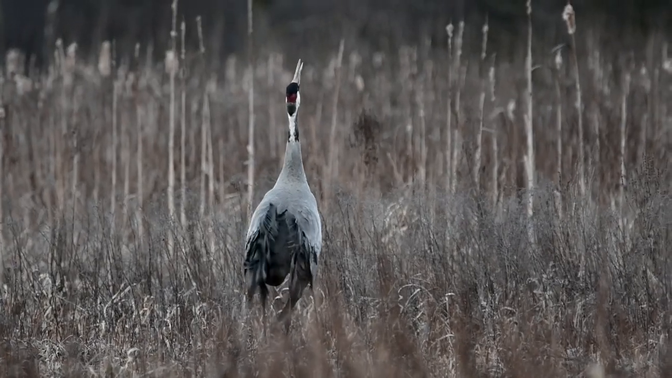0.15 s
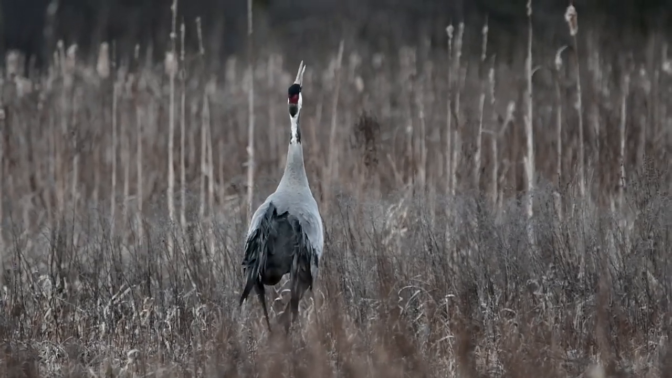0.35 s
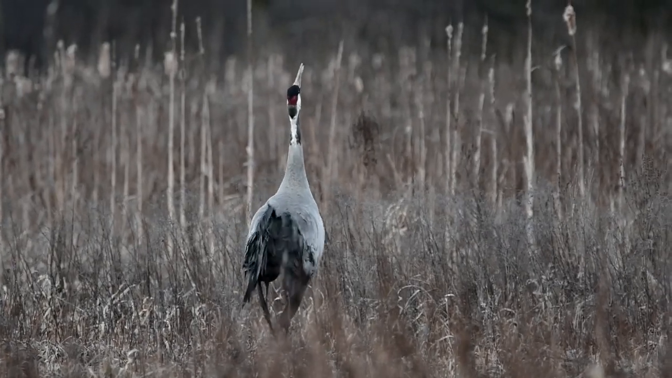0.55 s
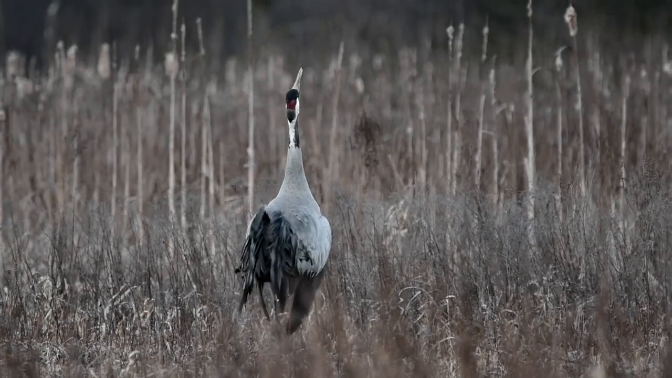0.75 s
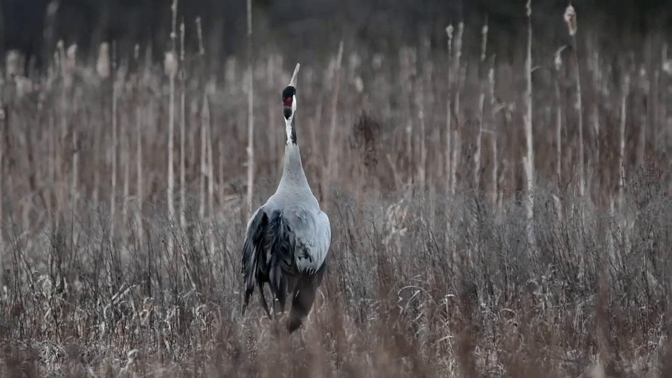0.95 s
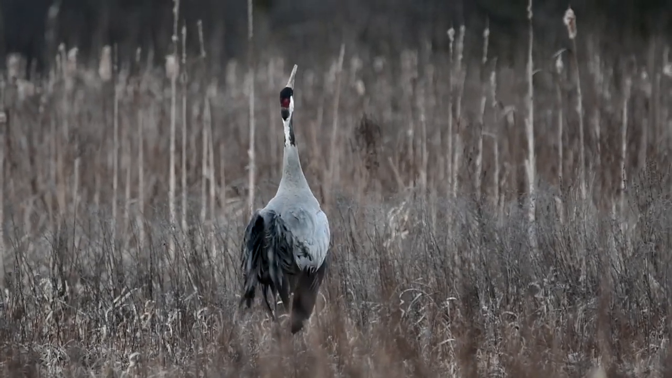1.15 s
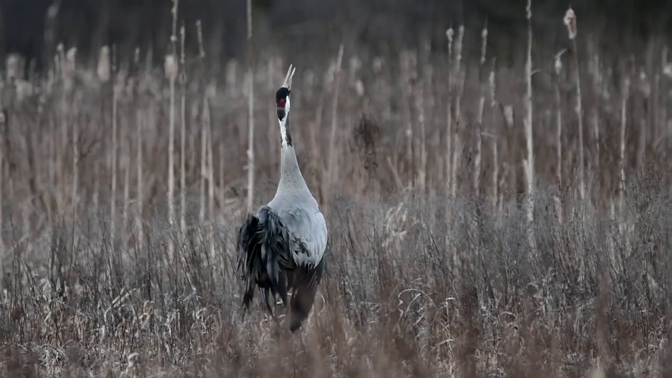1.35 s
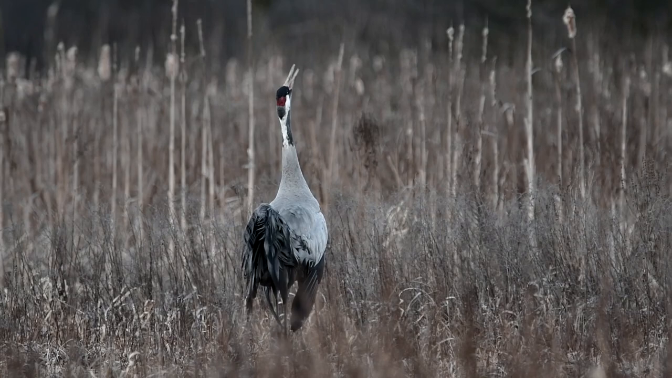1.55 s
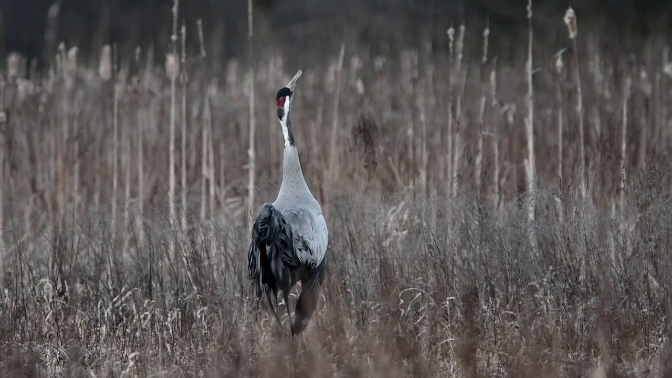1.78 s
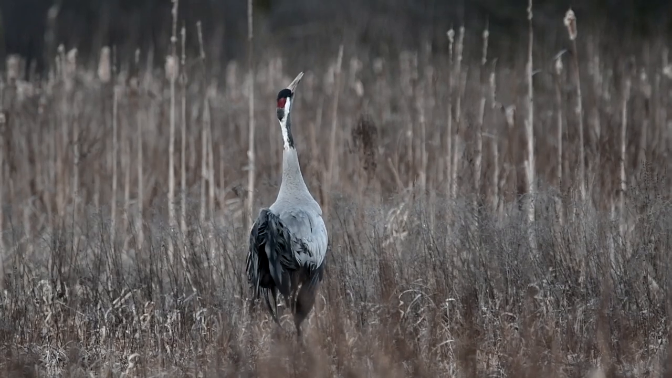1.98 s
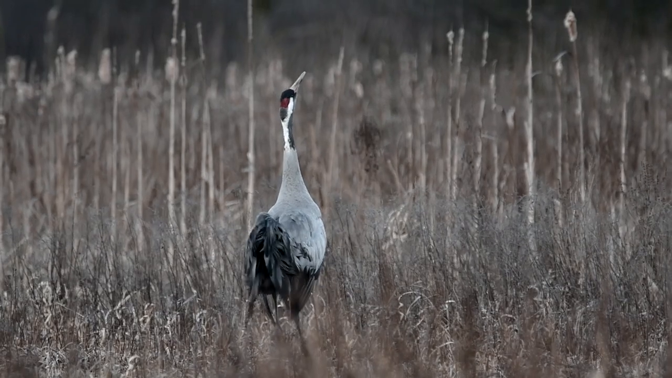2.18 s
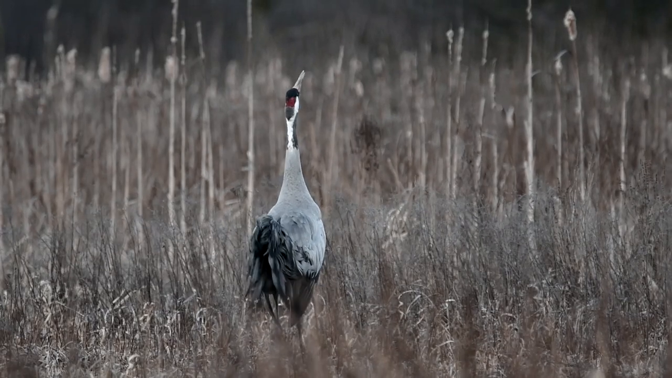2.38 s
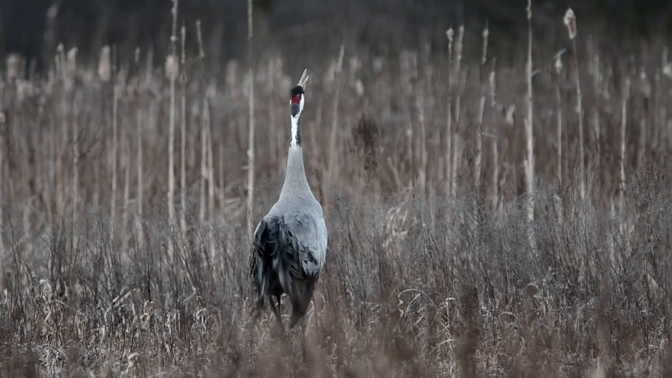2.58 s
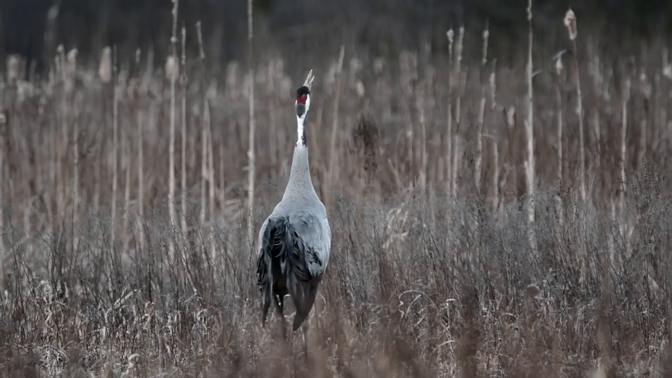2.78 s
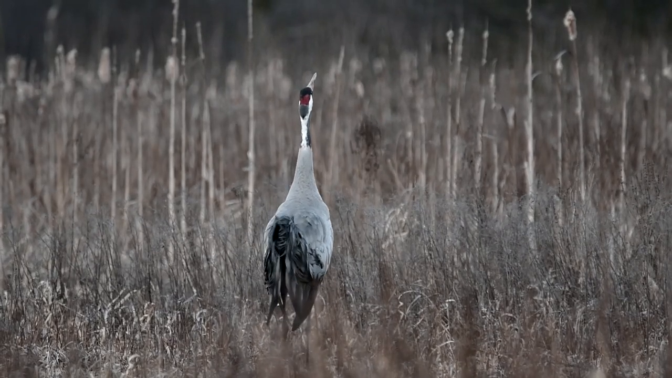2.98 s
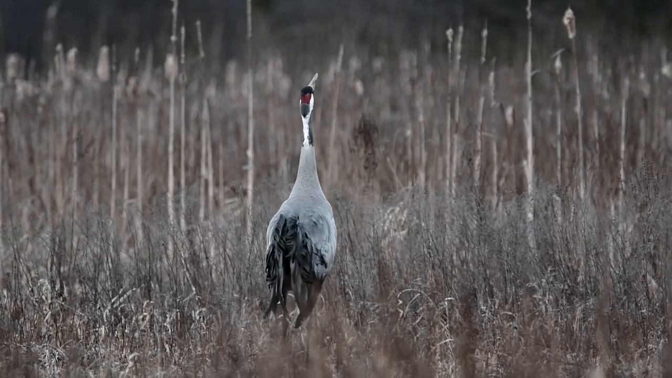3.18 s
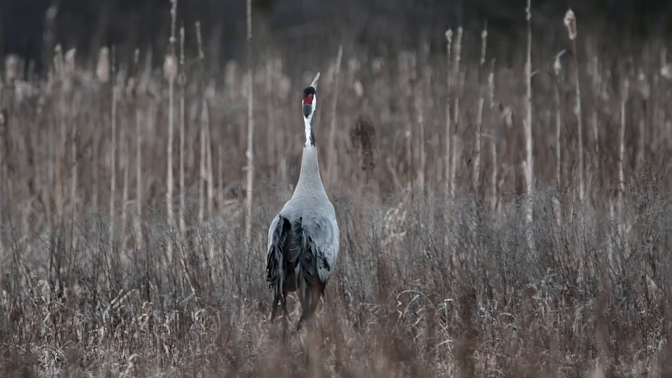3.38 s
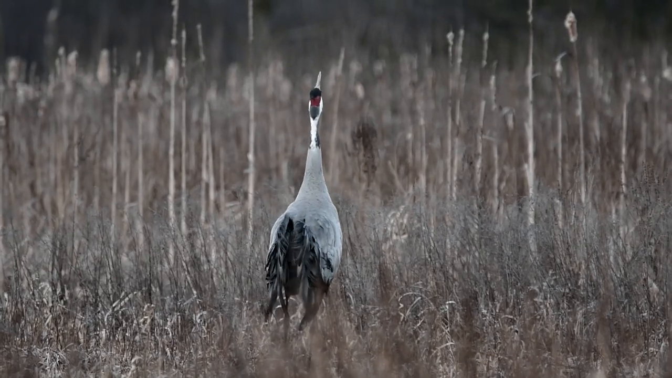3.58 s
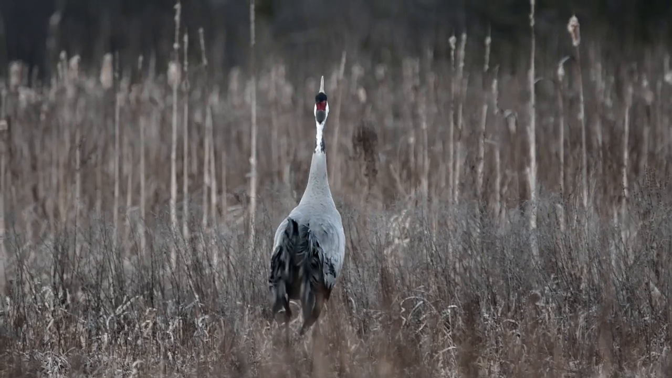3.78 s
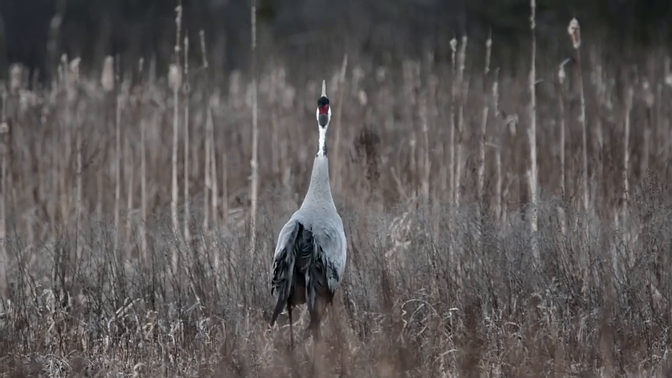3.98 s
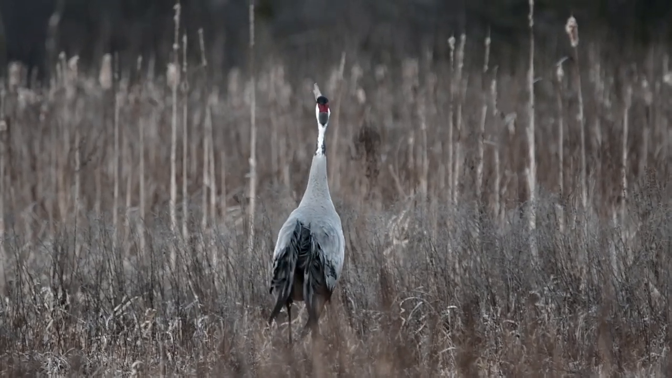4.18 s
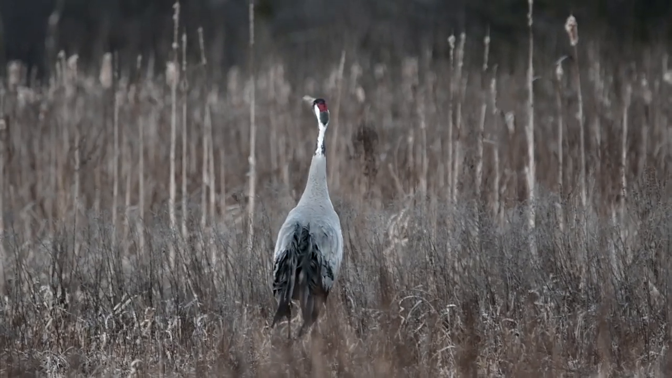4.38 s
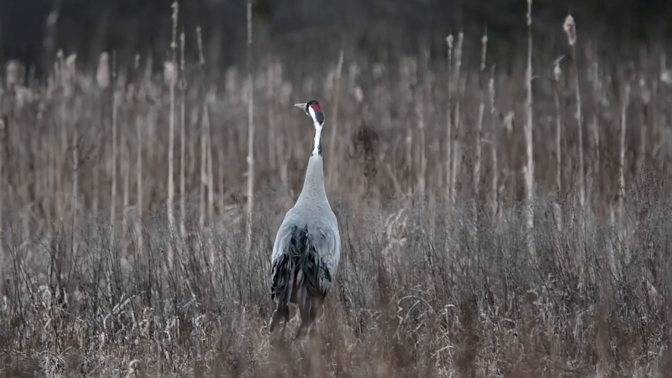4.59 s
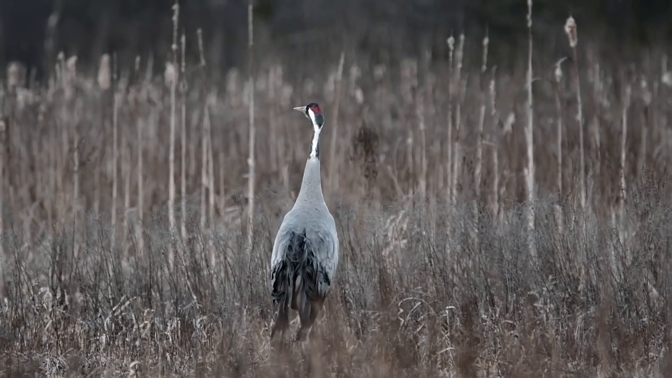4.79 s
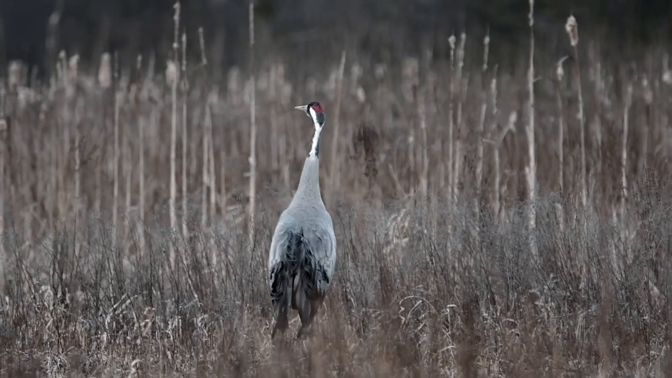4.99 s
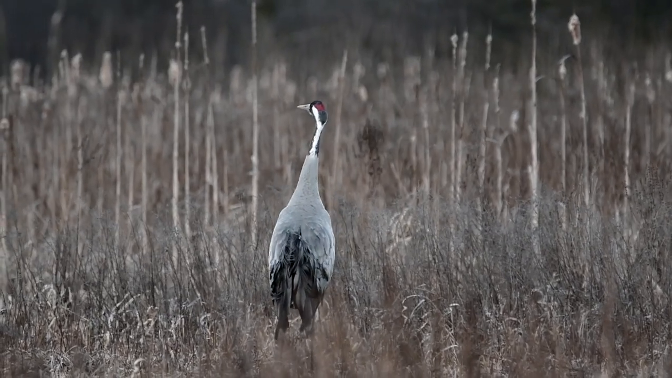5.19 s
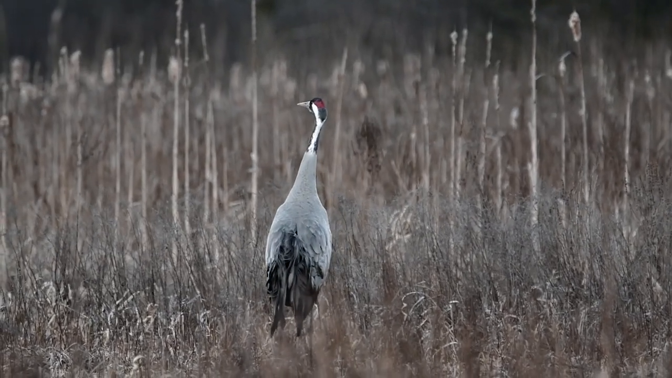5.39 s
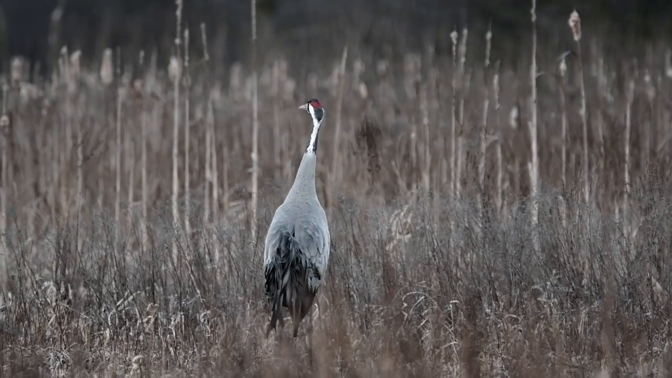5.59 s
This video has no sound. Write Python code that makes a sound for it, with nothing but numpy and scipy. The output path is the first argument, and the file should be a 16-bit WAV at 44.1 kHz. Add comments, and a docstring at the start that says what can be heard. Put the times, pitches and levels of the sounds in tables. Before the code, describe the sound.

A pair of cranes calls outdoors: hoarse bugling blasts breaking into rattles, answered by clean higher toots, with a faint echo from distant trees.

```python
"""Crane duet by the reeds

A pair of cranes calls in duet at the edge of a reed bed, four rounds in all: gliding harmonics through a windpipe.
The male gives a short lead note, then a long brassy blast that leaps up and breaks into a rattle.
The female lays three short, higher toots over it, each stuttering in, locking and dropping loose again.
Decaying noise echoes give the faint tail of reeds and far trees; banded noise makes a soft outdoor hush.
Damped sines make a few low bumps, gliding sines faint small birds, short noise grains dry crackles."""
import sys
import numpy as np
from scipy import signal
from scipy.fft import rfft, irfft, next_fast_len
from scipy.io import wavfile

SR = 44100
rng = np.random.default_rng(int(sys.argv[2]) if len(sys.argv) > 2 else 0)


def master_out(mix):
    """Clip the mix to full scale and print it as 16-bit PCM to the path in sys.argv[1]."""
    frames = np.transpose(np.atleast_2d(mix))
    ceiling = np.clip(frames, -1, 1)
    pcm = np.round(ceiling * 32767).astype(np.int16)
    wavfile.write(sys.argv[1], SR, pcm)


N = 249155
TIME = np.arange(N) / SR

# colour of each bird's long coiled windpipe: (frequency [Hz], level [dB])
MALE_WINDPIPE = [(550, -11), (700, -7), (900, -7.5), (1150, -31.5), (1400, 5), (1650, 3.5), (1850, 1.5),
                 (2350, -9), (2750, -3.5), (3200, -3.5), (4000, -9.5), (5600, -16.5), (6500, -21.5),
                 (9000, -50)]
FEMALE_WINDPIPE = [(600, -9.5), (850, 0), (1000, 0), (1110, -2.5), (1400, 16.5), (1900, 5.5), (2200, 3),
                   (3300, -4.5), (4400, -17), (5500, -26.5), (6600, -16.5), (9000, -88.5)]
# low standing waves of the male's windpipe, rung by ragged blowing: (frequency [Hz], relative level [dB])
LOW_PIPE_MODES = [(735, -1.5), (870, -1)]
# the male's bright lead notes, one a round: (start [s], length [s], top pitch [Hz], level [dB],
# brightness [dB at the fourth harmonic], windpipe ring [dB], hoarse start [s])
LEAD_NOTES = [(-.07, 0.18, 822.4, -41, 5.5, -24.5, 0.013), (1.104, 0.15, 817, -40.5, 5, -2, 0.012),
              (2.319, .166, 797.7, -44, 1.5, 6, .03), (3.597, 0.17, 779, -44.5, 0, 1.5, 0.076)]
# his long blasts: (start [s], hoarse start [s], time to the break [s], rattle length [s], level [dB],
# brightness [dB at the fourth harmonic], ring [dB], rattle roughness [0-1], loss over the rattle [dB],
# release [dB/s], low pipe modes [dB])
LONG_BLASTS = [(.221, 0.0392, 0.27, 0.058, -36, 1, 10, 0.65, 6.5, 231, 1.5),
               (1.343, 0.0831, 0.19, 0.17, -36.5, -1, -0.5, 0.47, 1, 296, 8.5),
               (2.589, 0.119, .133, .16, -35.5, -6, 5, .58, 3.5, 174, 3),
               (3.873, .045, 0.16, 0.22, -36, -1, 6.5, 0.81, 9, 498.5, -1.5)]
# flips into his upper register: (up [s], down [s], pitch [Hz], ring [dB], roughness [0-1])
REGISTER_LEAPS = [(.068, .126, 893, 12, .36), (.2, .503, 908, 14, .02), (1.405, 1.505, 902, -15, .07),
                  (2.635, 2.722, 903, 10, .38), (3.964, 4.03, 897, 2, .24)]
# even runs of air bursts ending each blast:
# (first burst [s], spacing [s], run length [s], level [dB], fade by the last burst [dB])
BURST_RUNS = [(.511, .0175, .095, -38, 13), (1.7, .0315, .08, -40.5, 1), (2.922, .021, .095, -41.5, 4),
              (4.055, .0286, .215, -37.5, 11)]
# the female's toots, three to a round:
# (pitch locks [s], length [s], stutter before it [s], level [dB], brightness above the fundamental [dB])
TOOT_NOTES = [(.135, 0.13, 0.018, -34, -6.5), (0.409, 0.079, 0.022, -33.5, -10.5),
              (0.694, 0.059, 0.029, -37, -4.5), (1.287, .132, .024, -33.5, -10),
              (1.575, .073, 0.033, -33, -6.5), (1.851, 0.066, 0.024, -34.5, -7.5),
              (2.521, 0.13, 0.028, -32, -4), (2.801, 0.086, 0.015, -33, -7.5),
              (3.089, .065, .022, -32.5, -5.5), (3.8, .13, .024, -32.5, -13),
              (4.075, 0.074, 0.034, -36, -7.5), (4.338, .072, .043, -38.5, -4.5)]
# for the first, second and third toot of a round: (pitch [Hz])
TOOT_PITCH_HZ = [1117, 1108, 1103]
# strength of the stutter in the same three toots: (level [dB])
TOOT_STUTTER_DB = [-1, -1, 0.5]
# how the calls lean between the ears: (frequency [Hz], left minus right [dB])
EAR_LEAN = [(60, 8), (100, 2.5), (170, -3.5), (290, -1.5), (480, -4), (820, 2.5), (1380, -2), (2320, -3),
            (3910, 3), (6590, -2.5)]
# spectrum of the outdoor hush: (frequency [Hz], relative band gain [dB])
HUSH_SPECTRUM = [(25, -12.5), (60, -3.5), (130, 2.5), (260, -4.5), (380, -3), (560, -10.5), (900, -4),
                 (1300, -11.5), (3000, -15.5), (6600, -18.5), (7600, -48.5), (9000, -28.5), (11000, -31.5),
                 (15500, -35.5)]
# left-right likeness of the hush: (frequency [Hz], correlation [-1 to 1])
HUSH_LIKENESS = [(60, 0.99), (150, 1), (390, 0.98), (1010, 0.54), (2570, -0.19), (6590, -0.07)]
# low rumble of moving air: (time [s], relative level [dB])
AIR_RUMBLE = [(0, -17.5), (1.7, -2), (2.7, -5), (4.1, 2), (5.6, -10.5)]
# soft low bumps: (start [s], envelope peak [dB], frequency [Hz])
LOW_BUMPS = [(1.068, -50, 170), (1.965, -40.5, 128.5), (2.145, -37.5, 195), (2.186, -35, 182),
             (2.207, -40, 200), (2.374, -42.5, 211), (4.134, -38.5, 183.8), (4.859, -45.5, 137),
             (4.899, -47, 109.4), (5.12, -40.5, 175)]
# faint small birds: (start [s], length [s], start pitch [Hz], end pitch [Hz], level [dB])
BIRD_CHIRPS = [(3.329, 0.031, 6000, 6150, -68), (3.352, 0.052, 6250, 6570, -60),
               (3.443, 0.067, 5940, 6200, -63), (3.49, 0.048, 6250, 6600, -61.5),
               (3.644, 0.06, 6200, 6530, -56.5), (5.506, 0.17, 1700, 1396, -60)]
# crackles of dry stalks: (start [s], length [s], level [dB])
STALK_CRACKLES = [(2.896, 0.0035, -49), (5.15, 0.048, -59)]

RING_HZ, RING_WIDTH_HZ = 2906, 198  # a resonance that comes and goes in the male's note
# a lead note arches in pitch, swells and brightens towards its top, and frays at the end
LEAD_TOP_SHARE, LEAD_SCOOP, LEAD_SWELL_DB, LEAD_OPEN_DB = 0.7, .075, 2.5, 4
LEAD_ROUGH, FRAY_ROUGH, FRAY_S, LEAD_RELEASE_DB_PER_S = .85, .42, .02, 800
LEAD_DROP = .045  # share by which the pitch falls as the note frays
# a blast climbs as it steadies and sinks as it rattles; its level droops as the air runs out
BLAST_HZ, RATTLE_START_HZ = 826, 824
BLAST_SCOOP, RATTLE_SAG = .03, 0.065
STRAIN_ROUGH, STRAIN_S = 0.208, 0.14  # roughness creeps in before the break
ATTACK_S, BREAK_S = 0.0022, 0.01333
HOARSE_ROUGH, HOARSE_DB, DROOP_DB_PER_S = .66, -3.5, 12.5
LEAP_DB, LEAP_BRIGHT_DB, LEAP_ARCH, LEAP_STEADYING = 2.5, -3.5, 0.012, 0.21
BURST_RISE_S, BURST_JITTER_S, BURST_SPREAD_DB = .0056, .0012, 1.0
CATCH_BEFORE_S, CATCH_S, CATCH_DB = 0.022, 0.0013, -9.5  # her voice catches just before the note locks
REEDS_T60_S, REEDS_DB = .22, -16
TREES_T60_S, TREES_CUT_HZ, TREES_DB = 1.6, 3200, -23
HUSH_DB = -57.5
CUTOFF_HZ = 15700


def male(flutter_hz=60, flutter_depth=0.427, flutter_bend=0.086, burst_bend=.11, burst_bright_db=-0.5,
         slack_db=-5, fundamental_trade=.2, top_lift=1.97):
    """Where the note turns rough, each pressure surge moves level, pitch and brightness together."""
    jitter, quaver, rasp_db, mode_width_hz = .039, .003, -9, 28
    gain, pitch, bright_db, ring_db, rough, modes_db = blowing()
    beat = rough * flutter(flutter_hz, wander=.3)
    held = gain * np.exp(flutter_depth * (beat - rough / 2))
    bursts = air_bursts()
    surge = bursts / (bursts + held + from_db(-42.5))

    # between surges the membranes go slack: the pitch sinks and the fundamental takes over
    slack = rough ** 2 * (1 - surge) * (1 - beat)
    bend = flutter_bend * beat + burst_bend * surge - .05 * slack
    unsteady = jitter * rough ** 1.555 * drift(286) + quaver * drift(20)
    pitch = pitch * (1 + bend + unsteady)
    bright_db = bright_db + burst_bright_db * (surge + beat)

    def tilt_db(k):
        """Brightness and slackness shift the balance between the fundamental and harmonic k."""
        share = np.interp(k, [1, 2, 4, 8], [-fundamental_trade, 0, 1, top_lift])
        return bright_db * share + slack_db * slack * (1 if k > 1 else -1)

    tone, phase = trumpet(pitch, MALE_WINDPIPE, tilt_db, ring_db, waver_db=2.5, count=11)
    # in the rough parts each few cycles differ in strength
    level = np.hypot(held, bursts) * np.exp(0.33 * rough * drift(150))
    voice = tone + from_db(rasp_db) * rough * rasp(phase, MALE_WINDPIPE)

    # ragged blowing sets the low pipe modes ringing
    raggedness = from_db(modes_db) * (level * rough ** 2 + bursts / 2)
    ragged = raggedness * rng.standard_normal(N) * np.sqrt(SR / (np.pi * mode_width_hz))
    pipe = sum(from_db(db) * resonate(ragged, hz, mode_width_hz) for hz, db in LOW_PIPE_MODES)
    return level * voice + butter(pipe, 803, "high", order=6)


def blowing():
    """Lead notes and blasts, the stronger one in charge; the upper register is higher, louder and rounder."""
    lead, blast = lead_notes(), blasts()
    gain, pitch, bright_db, ring_db, rough, modes_db = np.where(lead[0] > blast[0], lead, blast)
    age, down, high_hz, high_ring_db, high_rough = sounding(REGISTER_LEAPS)
    length = down - (TIME - age)
    high = ramp(2 * age / BREAK_S) * ramp((down - TIME) / BREAK_S + .5)
    high_hz = high_hz * (1 - LEAP_ARCH * (2 * ramp(age / length) - 1) ** 2)

    gain = gain * from_db(LEAP_DB * high)
    pitch = pitch + high * (high_hz - pitch)
    bright_db = bright_db + LEAP_BRIGHT_DB * high
    ring_db = ring_db + high * (high_ring_db - ring_db)
    rough = ramp(np.maximum(rough * (1 - LEAP_STEADYING * high), high * high_rough))
    return gain, pitch, bright_db, ring_db, rough, modes_db


def lead_notes():
    """Gain, pitch, brightness, ring, roughness and low-mode level of the male's arched opening notes."""
    age, length, top_hz, level_db, bright_db, ring_db, hoarse_s = sounding(LEAD_NOTES)
    off_top = ramp(np.abs(age / length / LEAD_TOP_SHARE - 1) ** 1.7)
    hoarse = np.exp(-(age / hoarse_s) ** 2)
    fray = np.exp(np.minimum(age - length, 0) / FRAY_S)
    release_db = LEAD_RELEASE_DB_PER_S * np.maximum(age - length, 0)
    level_db = level_db + HOARSE_DB * hoarse - LEAD_SWELL_DB * off_top - release_db
    gain = ramp(age / ATTACK_S) * from_db(level_db)
    pitch = top_hz * (1 - LEAD_SCOOP * off_top - LEAD_DROP * fray)
    bright_db = bright_db - LEAD_OPEN_DB * off_top
    rough = LEAD_ROUGH * hoarse + FRAY_ROUGH * fray
    return np.array([gain, pitch, bright_db, ring_db, rough, np.zeros(N)])


def blasts():
    """The same controls for his long notes: a hoarse start, a clearer middle, then a sinking rattle."""
    (age, hoarse_s, break_s, rattle_s, level_db, bright_db, ring_db,
     rattle_rough, loss_db, release_db_per_s, modes_db) = sounding(LONG_BLASTS)
    hoarse = 1 - ramp(age / hoarse_s) ** 3
    broken = ramp((age - break_s) / BREAK_S + .5)
    spent = np.clip((age - break_s) / rattle_s, 0, 2)
    strain = STRAIN_ROUGH * np.exp(np.minimum(age - break_s, 0) / STRAIN_S)
    rough = (1 - broken) * np.maximum(HOARSE_ROUGH * hoarse, strain) + broken * rattle_rough

    steady_hz = BLAST_HZ * (1 - BLAST_SCOOP * hoarse)
    rattle_hz = RATTLE_START_HZ * (1 - RATTLE_SAG * spent)
    pitch = (1 - broken) * steady_hz + broken * rattle_hz

    droop_db = DROOP_DB_PER_S * np.maximum(age - hoarse_s, 0)
    release_db = release_db_per_s * np.maximum(age - break_s - rattle_s, 0)
    level_db = level_db + HOARSE_DB * hoarse - droop_db - loss_db * spent ** 2 - release_db
    gain = ramp(age / ATTACK_S) * from_db(level_db)
    return np.array([gain, pitch, bright_db, ring_db, rough, modes_db])


def air_bursts():
    """Runs of pressure surges that mostly hold their strength and fade at the last."""
    out = 0
    for first, spacing, length, level_db, fade_db in BURST_RUNS:
        ages = np.arange(0, length, spacing)
        for age, (late, strong) in zip(ages, rng.standard_normal((len(ages), 2))):
            db = level_db - fade_db * (age / ages[-1]) ** 6 + BURST_SPREAD_DB * strong
            out = out + from_db(db) * puff(first + age + BURST_JITTER_S * late, BURST_RISE_S)
    return out


def female(scoop=0.091, sag=0.03, rise=.008, fall=0.17, fall_s=0.011, fade_s=0.017,
           stutter_hz=80, stutter_depth=0.42, loose_dull_db=-12, jitter=0.04):
    """Each toot stutters in low, locks onto a clean arched pitch, sags, then drops loose again and dies."""
    rasp_db = -6
    notes = np.array(TOOT_NOTES)
    halfway = (notes[1:, 0] + notes[:-1, 0] + notes[:-1, 1]) / 2  # middle of each gap between notes
    nearest = np.searchsorted(halfway, TIME)
    lock, length, lead_s, level_db, bright_db = notes[nearest].T
    end = lock + length
    pitch = np.array(TOOT_PITCH_HZ)[nearest % len(TOOT_PITCH_HZ)]

    before = ramp((lock - TIME) / .009)
    after = ramp((TIME - end) / fall_s + .5)
    loose = np.maximum(before, after)
    along = ramp((TIME - lock) / length)
    unsettled = np.maximum(loose, 0.55 * np.exp(-np.maximum(TIME - lock, 0) / 0.013))
    beat = unsettled * flutter(stutter_hz, wander=0.27)

    arch = rise * (1 - along) ** 4 + sag * along ** 3
    unsteady = 0.037 * beat + jitter * loose * drift(260) + 0.00087 * drift(40)
    pitch = pitch * (1 - scoop * before - fall * after - arch + unsteady)
    attack = ramp((TIME - lock + lead_s) / 0.0028)
    gate = attack * np.exp(-np.maximum(TIME - end, 0) / fade_s)

    # the upper harmonics are the last to come and the first to go
    weak = np.maximum(loose, (2 * along - 1) ** 4 / 2)

    def tilt_db(k):
        """Note brightness, less the dulling of harmonic k where the voice is weak."""
        return bright_db * (k > 1) + loose_dull_db * weak * np.log(k)

    tone, phase = trumpet(pitch, FEMALE_WINDPIPE, tilt_db, 0, waver_db=0.0, count=7)
    breath = butter(rasp(phase, FEMALE_WINDPIPE), 3800, "low", order=1)
    breaking = from_db(rasp_db) * (np.maximum(loose, unsettled ** 2) + 0.032) * breath

    catch = np.exp(-((TIME - lock + CATCH_BEFORE_S) / CATCH_S) ** 2)
    stutter_db = before * np.array(TOOT_STUTTER_DB)[nearest % len(TOOT_STUTTER_DB)]
    gain = from_db(level_db + stutter_db + CATCH_DB * catch) * gate
    return gain * (1 + stutter_depth * (beat - unsettled / 3)) * (tone + breaking)


def trumpet(pitch, pipe, tilt_db, ring_db, waver_db, count):
    """Harmonics of the syrinx, each weighted by the windpipe as it glides."""
    phase, out = 2 * np.pi * np.cumsum(pitch) / SR, 0
    spread = .16
    for k in range(1, count + 1):
        hz = k * pitch
        ring = ring_db * np.exp(-.5 * ((hz - RING_HZ) / RING_WIDTH_HZ) ** 2)
        gain = from_db(at_hz(pipe, hz) + tilt_db(k) + ring + waver_db * drift(13.4))
        # the long pipe smears each pulse a little: upper harmonics arrive later
        out = out + gain * np.cos(k * phase - spread * k * k)
    return np.sqrt(2) * out, phase


def rasp(phase, pipe):
    """Turbulence let through once a cycle and coloured by the windpipe."""
    hz = np.linspace(0, SR / 2, 513)
    colour = signal.firwin2(511, hz, from_db(at_hz(pipe, hz)), fs=SR)
    puffs = rng.standard_normal(N) * (1 + np.cos(phase)) ** 2
    coloured = signal.fftconvolve(puffs, colour, "same")
    return rms_one(butter(coloured, 620, "high", order=6))


def flutter(hz, wander):
    """An uneven beat of the syrinx membranes."""
    return np.sin(2 * np.pi * np.cumsum(hz * (1 + wander * drift(20))) / SR)


def place(x, pan_db, lag_ms):
    """A direction: the ears differ in level, pitch by pitch, and the right hears it a little later."""
    size = next_fast_len(N + 1000)
    hz = np.fft.rfftfreq(size, 1 / SR)
    lean_db = pan_db + at_hz(EAR_LEAN, hz)
    late = np.exp(-2j * np.pi * hz * lag_ms / 1000)
    ears = np.array([from_db(lean_db / 2), late * from_db(-lean_db / 2)])
    return irfft(rfft(x, size) * ears, size)[:, :N]


def scatter(x, t60, delay_s, cut_hz, alike):
    """Countless small reflections that build up and die away, partly shared by the two ears."""
    t = np.arange(int(1.5 * SR)) / SR
    envelope = from_db(-60 * t / t60) * (1 - np.exp(-t / delay_s))
    mid, side = rng.standard_normal((2, len(t))) * envelope
    echoes = two_ears(mid, side, alike)
    echoes = butter(echoes / np.sqrt(np.sum(echoes ** 2) / 2), cut_hz, "low")
    return signal.fftconvolve(x[None], echoes, axes=1)[:, :N]


def hush(patchy_db=0.5):
    """Air over the reeds and far country: noise bands that waver slightly; the lowest follow the breeze."""
    out, edges = 0, np.geomspace(22, 16000, 28)  # roughly third-octave bands
    white = rng.standard_normal((2, 2, N))
    rumble_db = np.interp(TIME, *np.transpose(AIR_RUMBLE))
    for k, (low, high) in enumerate(zip(edges, edges[1:])):
        # neighbouring bands take turns on two separate noises
        mid, side = butter(white[k % 2], [low, high], "band", order=3)
        hz = np.sqrt(low * high)
        waver_db = patchy_db * drift(19) / (1 + hz / 1500)
        breeze_db = rumble_db / (1 + (hz / 150) ** 2)
        gain = from_db(at_hz(HUSH_SPECTRUM, hz) + waver_db + breeze_db)
        out = out + gain * two_ears(mid, side, at_hz(HUSH_LIKENESS, hz))
    return from_db(HUSH_DB) * rms_one(out)


def bumps(rise_s=0.0028):
    """Soft knocks: low sines that swing only a cycle or two."""
    return sum(from_db(db) * puff(start + rise_s, rise_s) * np.sin(2 * np.pi * hz * (TIME - start))
               for start, db, hz in LOW_BUMPS)


def small_birds():
    """Thin whistles: single sines gliding in pitch under a smooth swell."""
    waver, out = 1 + 0.0028 * drift(150), 0
    for start, length, from_hz, to_hz, db in BIRD_CHIRPS:
        pitch = waver * np.interp(TIME, [start, start + length], [from_hz, to_hz])
        out = out + from_db(db) * swell(start, length) * np.sin(2 * np.pi * np.cumsum(pitch) / SR)
    return out


def dry_stalks():
    """Crackles: short swells of spiky, band-limited noise."""
    # cubing the noise makes it spiky
    grain = rms_one(butter(rng.standard_normal(N) ** 3, [1800, 6500], "band", order=4))
    return grain * sum(from_db(db) * swell(start, length) for start, length, db in STALK_CRACKLES)


def two_ears(mid, side, alike):
    """Left and right from two equally strong noises, with the given likeness."""
    alike = np.clip(alike, -1, 1)
    return np.sqrt(1 + alike) * mid + np.sqrt(1 - alike) * side * [[1], [-1]]


def sounding(table):
    """Time since the start of the current note, followed by that note's other columns."""
    rows = np.array(table)
    start, *columns = rows[np.searchsorted(rows[1:, 0], TIME)].T
    return [TIME - start, *columns]


def puff(peak_s, rise_s):
    """A quick rise to height 1 and a slower fall."""
    age = np.clip((TIME - peak_s) / rise_s + 1, 0, 20)
    return (age * np.exp(1 - age)) ** 2


def swell(start, length):
    """A smooth hump of height 1."""
    return np.interp(TIME, start + length * np.linspace(0, 1, 33), np.hanning(33))


def ramp(x):
    """From 0 to 1, then held."""
    return np.clip(x, 0, 1)


def drift(rate):
    """Smooth chance with spread 1 that changes about `rate` times a second."""
    r = np.exp(-16 * np.pi * rate / SR)  # made at an eighth of the sample rate
    noise = rng.standard_normal(N // 8 + 4002)
    slow = signal.lfilter([1], [1, -2 * r, r * r], noise)[4000:]  # skip the filter's settling
    return np.interp(np.arange(N) / 8, np.arange(len(slow)), rms_one(slow))


def resonate(x, hz, width_hz):
    """A resonance with gain 1 on top."""
    r = np.exp(-np.pi * width_hz / SR)
    feedback = [1, -2 * r * np.cos(2 * np.pi * hz / SR), r * r]
    return signal.lfilter(np.array([1, 0, -1]) * (1 - r * r) / 2, feedback, x)


def butter(x, hz, kind, order=2):
    """Butterworth filter."""
    return signal.sosfilt(signal.butter(order, hz, kind, fs=SR, output="sos"), x)


def at_hz(points, hz):
    """Read a spectrum on a log-frequency axis."""
    f, value = np.transpose(points)
    return np.interp(np.log(np.maximum(hz, 1)), np.log(np.maximum(f, 1)), value)


def from_db(db):
    """Decibels to gain."""
    return 10 ** (np.asarray(db) / 20)


def rms_one(x):
    """Scale to rms 1."""
    return x / np.sqrt(np.mean(x ** 2) + 1e-20)


def scene():
    """Both cranes, their echoes and the surroundings."""
    he, she = [butter(voice, 6660, "low", order=4) for voice in (male(), female())]
    direct = place(he, pan_db=0.55, lag_ms=0.027) + place(she, pan_db=0.0, lag_ms=0.052)
    both = he + she
    reeds = from_db(REEDS_DB) * scatter(both, REEDS_T60_S, delay_s=0.03, cut_hz=21000, alike=0.41)
    trees = from_db(TREES_DB) * scatter(both, TREES_T60_S, delay_s=0.04, cut_hz=TREES_CUT_HZ, alike=0.34)
    return direct + reeds + trees + hush() + bumps() + small_birds() + dry_stalks()


def record(dry):
    """A steep low-pass, run both ways so that it shifts nothing in time, cuts the top."""
    return signal.sosfiltfilt(signal.ellip(10, .05, 70, CUTOFF_HZ, fs=SR, output="sos"), dry)


dry = scene()
out = record(dry)
master_out(out)
```